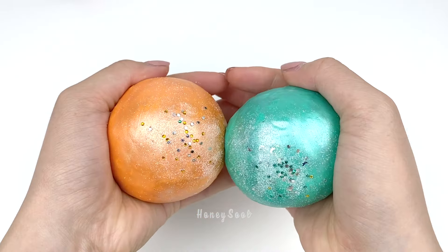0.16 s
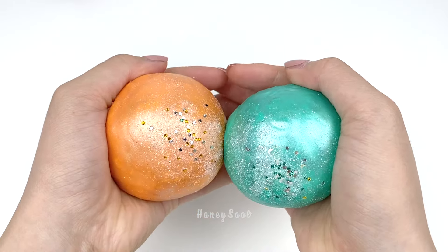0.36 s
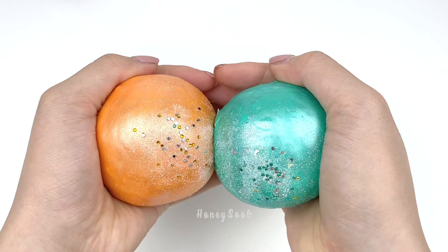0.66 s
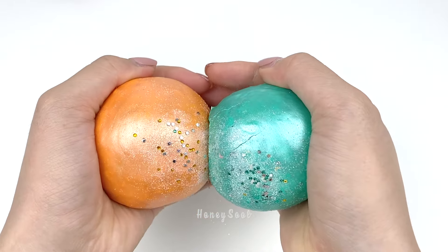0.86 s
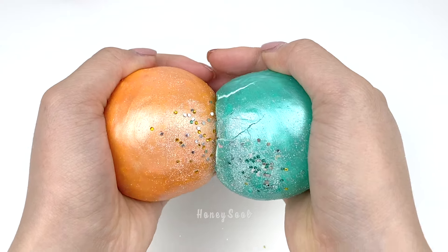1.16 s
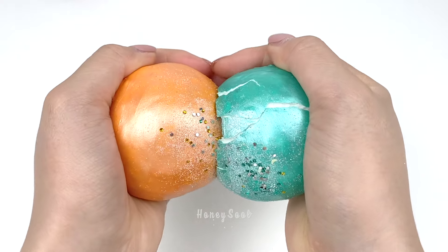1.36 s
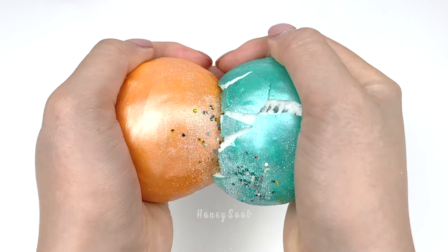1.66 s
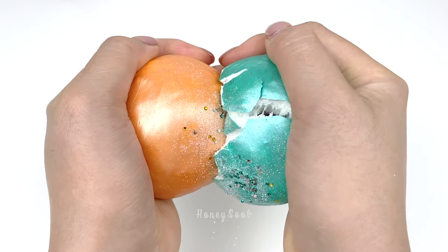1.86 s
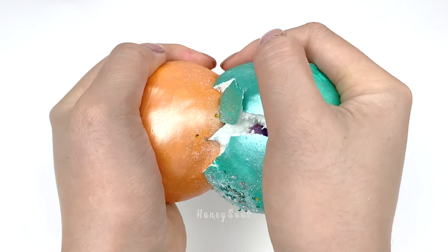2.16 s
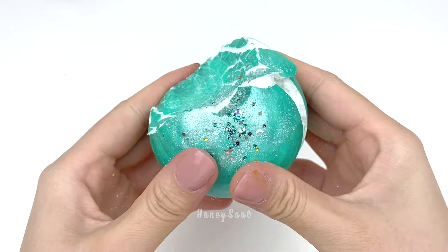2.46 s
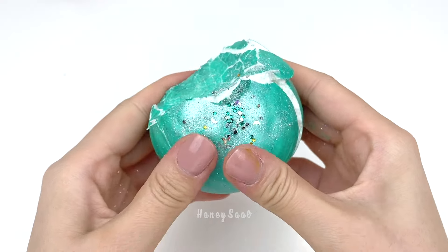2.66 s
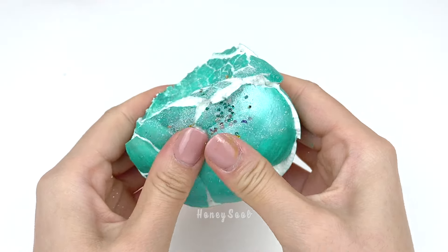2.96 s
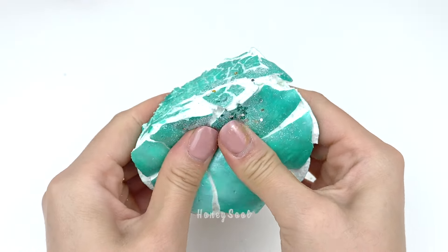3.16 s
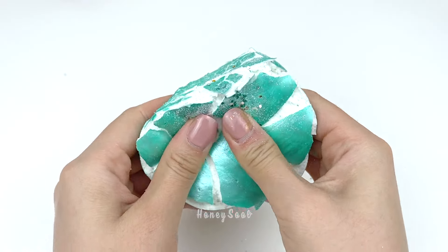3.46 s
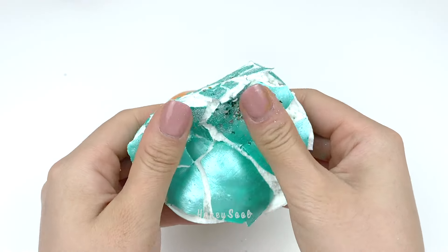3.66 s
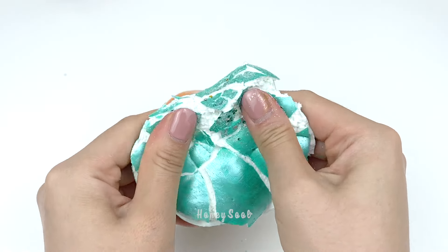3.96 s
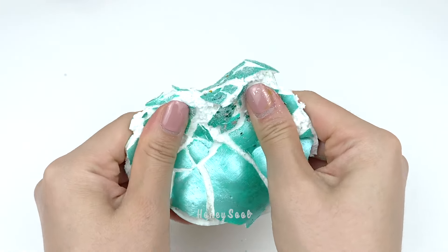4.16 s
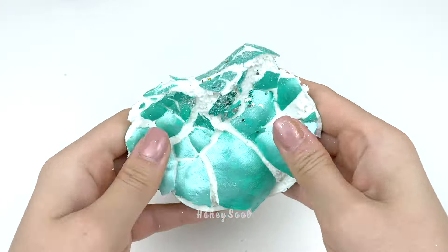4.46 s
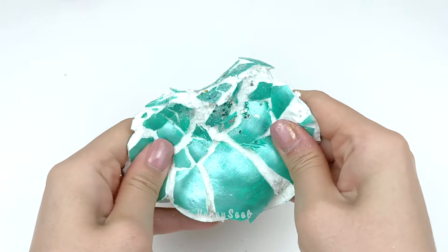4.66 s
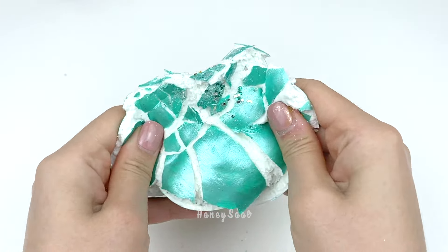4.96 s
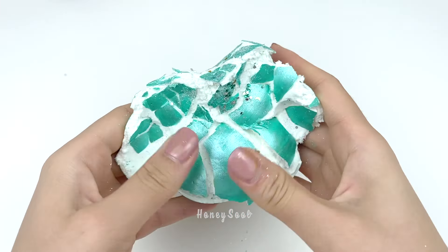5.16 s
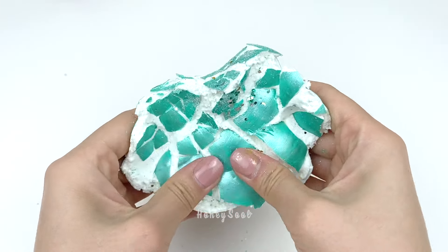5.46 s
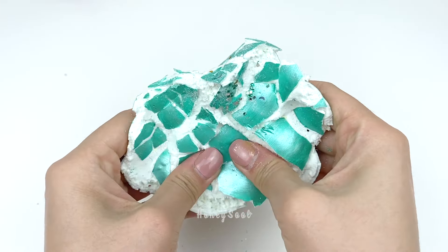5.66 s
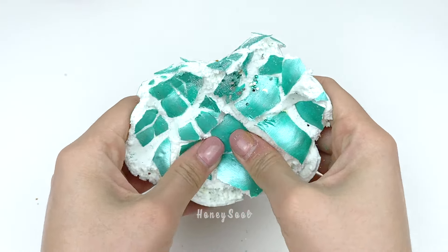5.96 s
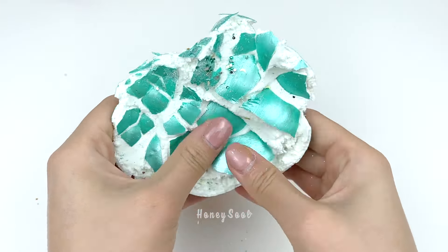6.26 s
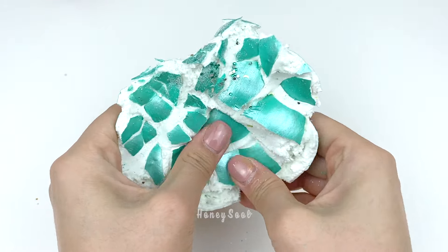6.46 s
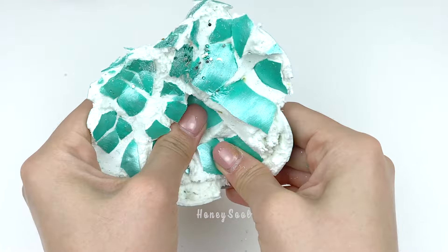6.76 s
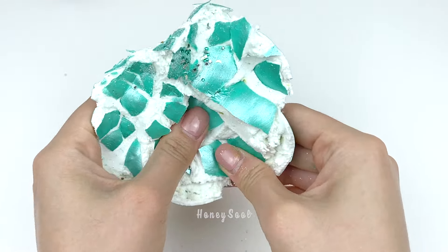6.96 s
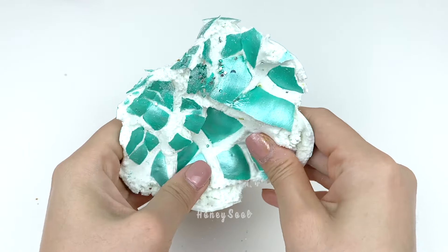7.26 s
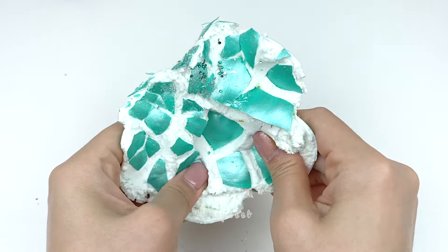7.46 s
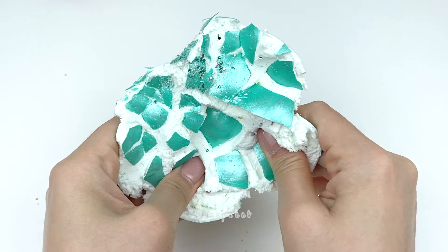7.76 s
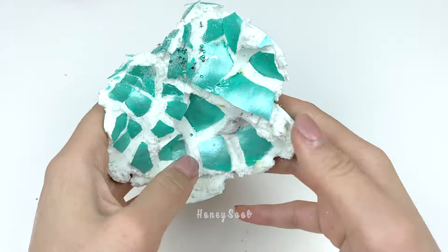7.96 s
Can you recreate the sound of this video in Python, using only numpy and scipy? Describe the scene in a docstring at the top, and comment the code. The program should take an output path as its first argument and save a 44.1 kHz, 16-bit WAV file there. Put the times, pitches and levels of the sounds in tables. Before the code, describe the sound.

Two soft clay balls in hard plaster shells are crushed by hand, very close to a stereo microphone in a small, quiet room. From 0 to 0.6 s come quick hollow snaps with dull, boomy knocks and low hand thumps. Sharper cracks follow from 0.7 s, thickening into continuous crackling from 1.2 s; heavy crunches hit near 1.65 and 2.14 s. Then it nearly falls quiet until about 2.6 s. A strong crunch at 2.8 s opens a drier, brighter stretch of flake snaps and trickling crumbs, with a hard break at 3.9 s. Short gritty scrapes rub at 4.5, 4.8 and 5.3 s, the first two falling in pitch. From 5.5 s, sparser clicks and small crumbling squeezes alternate with lulls and soft low bumps, a deeper knock at 6.45 s, a faint scrape at 7.4 s, and a bright sharp crackle at 7.9 s.

```python
"""Balls of soft clay in a hard plaster shell are crushed in two hands, right at a stereo microphone.
The shell snaps in short runs of tiny fractures: noise bursts that ring the flakes and the hollow between the palms.
Crumbs trickle after each snap, squeezes grind the pieces as dense random grains, and loose edges scrape as
resonant noise of sinking pitch. Damped sines knock the ball and thump the hands, a dull boom and a low rumble
lie beneath, a small room answers with decaying noise, and the loudest peaks overload the input."""
import sys
import numpy as np
from scipy import signal
from scipy.fft import rfft, irfft
from scipy.io import wavfile
from scipy.ndimage import uniform_filter1d

SR = 44100
rng = np.random.default_rng(int(sys.argv[2]) if len(sys.argv) > 2 else 0)


def int16_out(signal):
    """Quantize to a 16-bit WAV file."""
    q = np.round(np.clip(np.atleast_2d(signal).T, -1, 1) * 32767)
    wavfile.write(sys.argv[1], SR, q.astype(np.int16))


N = 358091
TIME = np.arange(N) / SR
SHATTER_S = 3.34  # time until the shell is in pieces

# snaps of the shell, relative levels: start_s, flake_db (sharp sound of the flakes), shell_db (hollow sound)
SNAPS = [(0.041, -25, -20.5), (0.062, -17, -8.5), (0.126, -21, -10.5), (0.31, -21, -17.5),
         (0.373, -20, -13.5), (0.456, -18, -11.5), (0.547, -19, -18), (0.667, -22.5, -22.5),
         (0.85, -17, -22.5), (0.872, -18, -30), (0.958, -21.5, -15.5), (0.996, -32.5, -21.5),
         (1.074, -17, -36), (1.202, -13.5, -15.5), (1.235, -31.5, -27), (1.299, -22.5, -17.5),
         (1.361, -36, -17), (1.423, -21.5, -17.5), (1.44, -19.5, -23.5), (1.471, -26.5, -16.5),
         (1.547, -21.5, -10.5), (1.582, -42, -10), (1.609, -21, -12), (1.658, -43.5, -2), (1.754, -37, -8),
         (1.798, -37, -9.5), (1.956, -13.5, -17), (2.045, -26.5, -9.5), (2.144, -21, -1.5),
         (2.715, -26, -29.5), (2.745, -27, -11), (2.834, -23.5, -12), (3.062, -34, -12),
         (3.103, -26.5, -18), (3.219, -23, -29.5), (3.289, -26.5, -30.5), (3.52, -23, -13.5),
         (3.606, -26.5, -21), (3.804, -34.5, -13.5), (3.824, -21, -6), (3.897, -28, -8.5),
         (3.928, -16.5, -3), (4.083, -24.5, -18), (4.106, -33.5, -9), (4.288, -18.5, -20),
         (4.695, -23, -12), (4.737, -23.5, -39), (4.801, -19.5, -32.5), (4.826, -26.5, -39),
         (5.033, -14.5, -12.5), (5.414, -33.5, -11), (5.489, -27, -11), (6.036, -25, -22),
         (6.067, -29.5, -16), (6.09, -38, -12.5), (6.221, -29.5, -26.5), (6.402, -35, -14),
         (6.535, -23.5, -40.5), (6.594, -23, -26), (6.622, -34, -13.5), (6.785, -27.5, -26.5),
         (7.01, -22, -12), (7.201, -19.5, -28.5), (7.408, -32, -82), (7.437, -22.5, -16),
         (7.5, -22.5, -15.5), (7.704, -37, -68), (7.895, -25.5, -10)]
# broken edges slipping past each other: start_s, hold_s, level_db (relative, at the start),
# pitch_hz (resonance at the start), fall_octaves_per_s
EDGE_SLIPS = [(4.535, 0.2, -16, 4140, 1.94), (4.8, 0.13, -27, 3350, 5.2), (5.31, 0.2, -21, 6000, 0.12),
              (7.431, 0.14, -26, 3400, 0.83)]


def snaps(flake, grit, shell, coarse, sharp_db=13.5, hollow_db=5.0, shell_s=0.0014):
    """Brittle fracture: each snap rings the flakes at its edges and the hollow shell behind them."""
    flake_s, longest_run_s = 0.0011, 0.0062  # decay of a flake's ring; time scale of a large crack
    sharp, dull = np.zeros((2, 2, N))
    for s, flake_db, shell_db in SNAPS:
        share = coarse[int(s * SR)]
        edge = np.sqrt(share) * unit(flake) + np.sqrt(1 - share) * unit(grit)
        edge = piece(edge, centre_hz=7000 * 0.31 ** share, own_db=6.0)  # large flakes ring lower
        for start, hold, _, hz, _ in EDGE_SLIPS:
            if start <= s <= start + hold:  # a snap during a scrape rings the flake that is being pushed
                edge = unit(resonate(flake, hz, 1))
        # small surface cracks are over at once
        run = longest_run_s * min(1, undb(0.5 * (flake_db + shell_db + 42.5)))
        add(sharp, s, undb(flake_db + sharp_db) * fracture(edge, flake_s, run))
        add(dull, s, undb(shell_db + hollow_db) * fracture(shell, shell_s, run))
    return (sharp + hollow(dull)) * np.sqrt(SR / 100)


def fracture(response, decay_s, run_s, count=8, size=2048):
    """Stepwise crack growth: a crack runs in a few jerks, the first at once, the later ones weaker on average."""
    delay = np.append(0, rng.uniform(0, 2 * run_s, count - 1))
    age = TIME[:size] - delay[:, None]
    power = rng.uniform(0.29, 1, (count, 1)) * np.exp(-delay[:, None] / run_s)
    jerks = power * (age >= 0) * np.exp(-2 * np.abs(age) / decay_s)
    return unit(burst(response, np.sqrt(np.sum(jerks, axis=0))))


def crumbling(flake, grit, shell, coarse, crackle_db, crunch_db):
    """Granular emission: flakes crackle, grit ticks, powder rubs and the shell crunches as the thumbs press."""
    flakes = grains(flake, centre_hz=3470, rate=1050, spread_db=9, decay_s=0.0006)
    flakes = flakes + undb(-7) * steady(flake)
    fines = grains(grit, centre_hz=6400, rate=750, spread_db=17.5, decay_s=0.00042)
    fines = fines + steady(grit)
    crunch = grains(shell, centre_hz=965, rate=450, spread_db=5.5, decay_s=0.0011)
    crunch = crunch + undb(-8.5) * steady(shell)
    crackle = np.sqrt(coarse) * flakes + np.sqrt(1 - coarse) * fines
    return undb(crackle_db) * crackle + undb(crunch_db - 5.5) * hollow(crunch)


def breakage():
    """Energy addition: squeezes and the crumbs after each snap, over resting hands, as crackle and crunch dB."""
    # pushes that crumble the shell, relative levels: start_s (of the hold), hold_s, crackle_db, crunch_db
    squeezes = [(0.0, 0.014, -20.5, -8.5), (0.699, 0.013, -15.5, -13), (1.047, 0.0062, -16, -17),
                (1.174, 0.5, -26.5, -22.5), (1.603, 0.019, -16.5, 2), (1.769, 0.22, -17.5, -12.5),
                (2.129, 0.025, -18.5, -7), (2.58, 0.32, -30.5, -38.5), (2.793, 0.058, -14.5, -8),
                (2.894, 0.17, -18, -19.5), (3.126, 0.12, -21, -26.5), (3.464, 0.036, -20, -17.5),
                (3.608, 0.11, -24.5, -23), (3.838, 0.19, -19.5, -19.5), (4.291, 0.0075, -12, -8.5),
                (4.32, 0.36, -30, -28.5), (4.668, 0.022, -15, -15), (5.035, 0.015, -11.5, -10.5),
                (5.293, 0.26, -22, -26.5), (5.444, 0.087, -36, -13), (5.614, 0.09, -23.5, -77),
                (6.037, 0.014, -16.5, -12), (6.331, 0.27, -24, -36.5), (6.432, 0.055, -30, -17.5),
                (6.744, 0.077, -29.5, -37), (7.013, 0.01, -11, -17.5), (7.063, 0.021, -18, -16.5),
                (7.23, 0.25, -33.5, -87), (7.46, 0.13, -30, -25.5), (7.879, 0.0092, -5, -15.5)]
    rest_crackle_db, rest_crunch_db = -35, -69  # crumbs shifting in resting hands, once the shell is in pieces
    crumb_flake_db, crumb_shell_db, crumb_db_per_s = -6.5, -15, 125  # trickle against its snap; its decay
    loose = np.clip(TIME / SHATTER_S, 0.05, 1)  # a whole shell has hardly any loose crumbs
    power = (undb([[rest_crackle_db], [rest_crunch_db]]) * loose) ** 2
    for start, hold, crackle_db, crunch_db in squeezes:
        power += (undb([[crackle_db], [crunch_db]]) * swell(start, hold)) ** 2
    trickle = undb(-crumb_db_per_s * TIME[:SR // 2])
    for s, flake_db, shell_db in SNAPS:
        shed = undb([[flake_db + crumb_flake_db], [shell_db + crumb_shell_db]]) * trickle
        add(power, s, np.sqrt(loose[int(s * SR)]) * shed ** 2)
    return 10 * np.log10(power)


def swell(start, hold, press_db_per_s=332, ease_db_per_s=300):
    """Exponential rise and decay: the gain of one push of the thumbs builds, holds and eases off."""
    early = np.maximum(start - TIME, 0)
    late = np.maximum(TIME - start - hold, 0)
    return undb(-np.minimum(press_db_per_s * early + ease_db_per_s * late, 120))


def grains(response, centre_hz, rate, spread_db, decay_s, count=20):
    """Random impulse excitation: unequal tiny breaks (rate per s) among pieces that each ring their own way."""
    pieces = [ring(piece(response, centre_hz), decay_s * rng.uniform(1.0, 3.44)) for _ in range(count)]
    out = np.zeros((2, N))
    for place, chance, size, which in rng.random((N // 40, 4)):
        if chance < rate * 40 / SR:
            gain = undb(-spread_db * np.log(0.015 + size))
            add(out, place * N / SR, gain * pieces[int(which * count)])
    # the hands feed in work steadily, so a large break is paid for by a lull around it (50 ms window)
    power = np.abs(uniform_filter1d(np.mean(out ** 2, axis=0), SR // 20))
    return out / np.sqrt(power + 1e-12)


def piece(response, centre_hz, q=3, own_db=7):
    """Size sets resonance: every piece has a size, and so a pitch, of its own."""
    hz = centre_hz * 2 ** rng.uniform(-1.05, 1)
    return unit(response + undb(own_db) * resonate(response, hz, q))


def ring(response, decay_s, size=512):
    """Exponential damping: the short ring of one piece of plaster."""
    return unit(burst(response, np.exp(-TIME[:size] / decay_s)))


def hollow(x, q=1.65, direct_db=-5, ring_db=0.5):
    """Cavity resonance: the hollow between the palms favours one pitch, which moves with the grip."""
    # resonance between the palms as the grip shifts: time_s, pitch_hz
    grip = [(0.1, 1180), (1.61, 760), (1.66, 1110), (2.14, 1230), (2.75, 850), (3.8, 1040), (3.9, 1460),
            (5.45, 870), (6.09, 1250), (6.42, 810), (6.62, 1300)]
    hz, = curves(grip)
    out = undb(direct_db) * x
    place = 3 * np.log2(hz / 1000)  # in third octaves from 1 kHz
    for step in range(-2, 3):  # third-octave resonators, faded from one to the next
        weight = np.maximum(1 - np.abs(place - step), 0)
        out = out + undb(ring_db) * weight * resonate(x, 1000 * 2 ** (step / 3), q)
    return out


def scrapes(flake, sag_db_per_s=18, q=2.5):
    """Stick-slip friction: rough edges slip unevenly and ring one flake, whose pitch sinks as it works loose."""
    slips = grains(flake, centre_hz=4000, rate=900, spread_db=8, decay_s=0.0005) + steady(flake)
    out = 0
    for start, hold, db, hz, fall_octaves_per_s in EDGE_SLIPS:
        age = np.maximum(TIME - start, 0)
        rung = resonate(slips, hz, q)
        rung = signal.sosfilt(signal.butter(2, 0.72 * hz, "high", fs=SR, output="sos"), rung)
        slowed = np.cumsum(2 ** (-fall_octaves_per_s * age))  # reading ever slower lowers the pitch
        sinking = np.array([np.interp(slowed, np.arange(N), side) for side in rung])
        gain = (TIME > start) * swell(start, hold) * undb(db - sag_db_per_s * age)
        out = out + gain * sinking / rung.std()
    return out


def knocks(cycles=0.73):
    """Damped oscillation: a deep break kicks the whole ball, which the soft clay inside damps very quickly."""
    # deep breaks: start_s, level_db (before a random spread in each channel)
    deep_breaks = [(0.038, 1), (0.128, 2), (0.179, 5.5), (1.639, 0.5), (2.804, 1), (3.062, -4), (3.928, 1),
                   (4.106, -2), (6.451, 3.5)]
    whole_hz, broken_hz = 311, 154.5  # middle pitch: it sinks as the shell loses its stiffness
    out, t = np.zeros((2, N)), TIME[:SR // 10]
    for s, db in deep_breaks:
        hz = np.interp(s, [0, SHATTER_S], [whole_hz, broken_hz]) * 2 ** (0.25 * rng.standard_normal())
        turns = hz * t
        swing = np.exp(-turns / cycles) * np.sin(2 * np.pi * turns)
        add(out, s, undb(db + 2 * rng.standard_normal((2, 1))) * swing)
    return out


def boom(plaster, low_hz=210, high_hz=640):
    """Body resonance: the closed ball lends a dull band of sound to whatever breaks on it."""
    # level of the boom against the plaster, faint once the ball is open: time_s, level_db
    boom_levels = [(0.19, 4), (0.31, -4), (1.65, -2.5), (2.1, -33)]
    boom_db, = curves(boom_levels)
    band = signal.butter(2, [low_hz, high_hz], "band", fs=SR, output="sos")
    return undb(boom_db) * signal.sosfilt(band, plaster)


def hands(pressing_db, swell_s=0.016, scuff_db=-13, rumble_db=-25, lean=0.83, follow=0.25):
    """Low-frequency impulse: soft jolts of a few cycles with a dull scuff, over a rumble that follows the pressing."""
    # the clay gives way and the hands jolt: start_s, level_db (peak of the sine's envelope), pitch_hz
    jolts = [(0.372, -4, 50), (0.461, -2, 47.4), (0.553, -2, 52), (1.627, -2, 39), (3.456, -6.5, 78),
             (3.645, 3, 35.7), (5.213, 2, 56.5), (5.276, -3, 67), (6.193, 2, 43.2), (6.275, 5, 50.8),
             (6.44, -0.5, 85), (7.01, 3, 50.5), (7.892, 2, 52.7), (8.1, 7.5, 52.2)]
    # spectrum of the rumble: frequency_hz, level_db (relative)
    rumble_colour = [(15, -5.5), (55, 6), (200, -20.5), (3000, -38)]
    out, t = np.zeros((2, N)), TIME[:SR // 5]
    envelope = (t / swell_s * np.exp(1 - t / swell_s)) ** 2
    for s, db, hz in jolts:
        # lean: random phase offset of each channel, in radians
        phase = 2 * np.pi * hz * t + rng.uniform(0, 2 * np.pi) + lean * rng.standard_normal((2, 1))
        band = signal.butter(2, [hz, 2.21 * hz], "band", fs=SR, output="sos")
        scuff = signal.sosfilt(band, rng.standard_normal(len(t)))
        jolt = envelope * (np.sin(phase) + undb(scuff_db) * scuff / scuff.std())
        add(out, s, undb(db) * jolt)
    rumble_gain = undb(rumble_db + follow * (pressing_db - pressing_db.mean()))
    return out + rumble_gain * steady(colour(rumble_colour))


def room(x, wet_db=-15, t60=0.16, ring_db=-29, ring_t60=0.43, q=12):
    """Reverberation: a short faint tail, and a few longer room modes in the middle register."""
    # room modes that ring on: pitch_hz
    modes = [738, 875, 1198]
    t = TIME[:SR // 2]
    build_up = 1 - np.exp(-t / 0.027)
    early, late = (burst(colour([(1, 0)]), np.exp(-np.log(1000) * t / s) * build_up) for s in (t60, ring_t60))
    late = sum(resonate(late, hz, q) / hz for hz in modes)
    tail = undb(wet_db) * unit(early) + undb(ring_db) * unit(late)
    return x + signal.oaconvolve(x.mean(axis=0)[None], tail, axes=1)[:, :N]


def steady(response):
    """Stationary noise: an even rub of level one."""
    return unit(burst(response, np.ones(N))[:, :N]) * np.sqrt(N)


def burst(response, envelope):
    """Modal superposition: countless unrelated modes under one envelope, as left and right."""
    noise = envelope * rng.standard_normal((2, len(envelope)))
    mid, side = signal.oaconvolve(noise, response, axes=1)
    return np.array([mid + side, mid - side])


def colour(points, size=2048):
    """Minimum phase: causal mid and side responses of a spectrum, by folding its cepstrum."""
    # width of the stereo image: frequency_hz, side_db (against mid)
    width = [(40, -2), (700, -17), (4000, -11.5), (10000, -5.5)]
    hz = np.maximum(np.fft.rfftfreq(size, 1 / SR), 1)
    db, side_db = (np.interp(np.log(hz), np.log(np.array(p)[:, 0]), np.array(p)[:, 1]) for p in (points, width))
    cepstrum = irfft(np.log(undb([db, db + side_db])))
    cepstrum[:, 1:size // 2] *= 2
    cepstrum[:, size // 2 + 1:] = 0
    return irfft(np.exp(rfft(cepstrum)))


def resonate(x, hz, q):
    """Simple resonance: a single peak of quality q."""
    return signal.lfilter(*signal.iirpeak(hz, q, fs=SR), x)


def unit(x):
    """Energy normalisation: scale to a mean energy of one per channel."""
    return x / np.sqrt(np.sum(x ** 2) / 2)


def undb(db):
    """Logarithmic level: decibels to gain."""
    return 10 ** (np.asarray(db) / 20)


def curves(table):
    """Linear interpolation: each column after the first as a line through time."""
    s, *columns = np.transpose(table)
    return [np.interp(TIME, s, c) for c in columns]


def add(out, s, sound):
    """Superposition: mix a sound in at a given time."""
    start = max(int(s * SR), 0)
    part = sound[:, :max(N - start, 0)]
    out[:, start:start + part.shape[1]] += part


def scene():
    """Superposition of sources: breaking plaster in the room, with boom and knocks of the ball and the hands."""
    # spectra of flakes, grit and hollow shell: frequency_hz, level_db (relative)
    flake_colour = [(300, -44), (1200, -11), (4200, -7), (7500, -10.5), (16000, -18.5)]
    grit_colour = [(500, -28.5), (3000, -12), (6000, -4), (16000, -4)]
    shell_colour = [(150, -0.5), (600, -10.5), (800, -7), (1150, -5.5), (1450, -10), (1850, -9.5),
                    (12000, -28)]
    flake, grit, shell = colour(flake_colour), colour(grit_colour), colour(shell_colour)
    crackle_db, crunch_db = breakage()
    # a light touch sheds mostly grit; under force, and when the shell itself gives way, larger flakes come off
    base_db, hollow_link, force_link = -2, 0.75, 0.18  # flakes against grit; its rise in dB per dB
    coarse_db = base_db + hollow_link * (crunch_db - crackle_db)
    coarse_db = coarse_db + force_link * (crackle_db - crackle_db.mean())
    coarse = 1 / (1 + undb(-coarse_db) ** 2)  # share of the large flakes
    plaster = snaps(flake, grit, shell, coarse)
    plaster = plaster + crumbling(flake, grit, shell, coarse, crackle_db, crunch_db)
    plaster = plaster + scrapes(flake)
    return room(plaster) + boom(plaster) + knocks() + hands(crunch_db)


def record(dry, ceiling=0.89, top_hz=15900):
    """Saturation and band limiting: the input flattens the loudest peaks, then the top is cut."""
    clipped = dry / (1 + (dry / ceiling) ** 8) ** (1 / 8)
    return signal.sosfilt(signal.ellip(10, 0.2, 60, top_hz, fs=SR, output="sos"), clipped)


dry = scene()
out = record(dry)
int16_out(out)
```